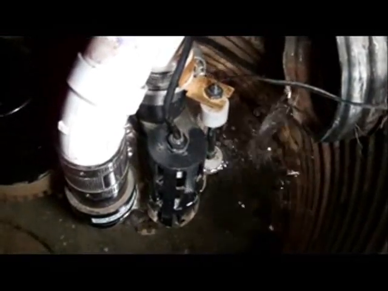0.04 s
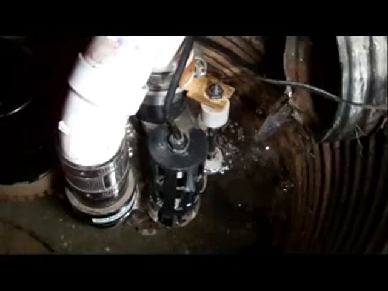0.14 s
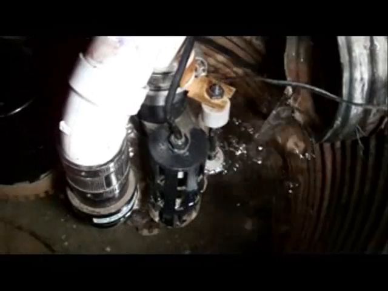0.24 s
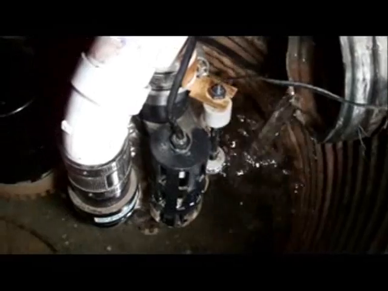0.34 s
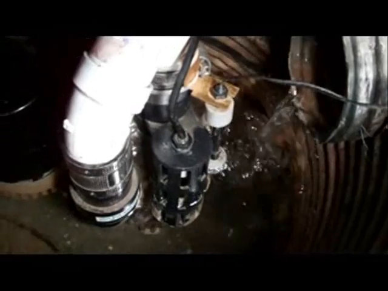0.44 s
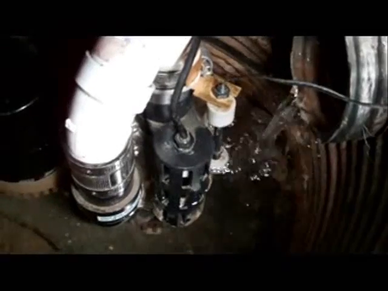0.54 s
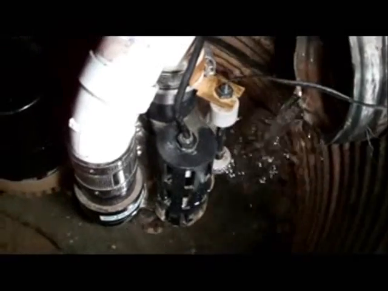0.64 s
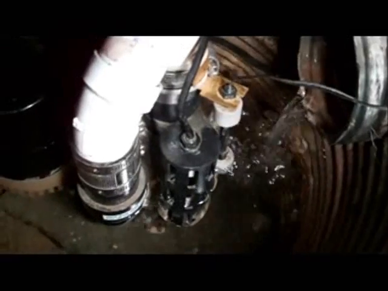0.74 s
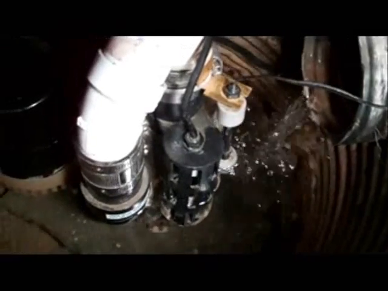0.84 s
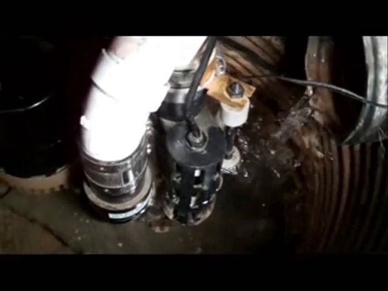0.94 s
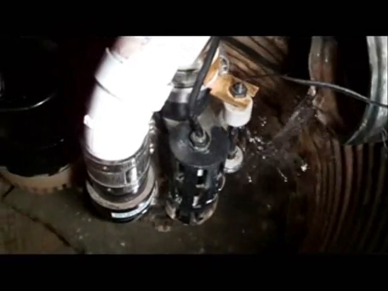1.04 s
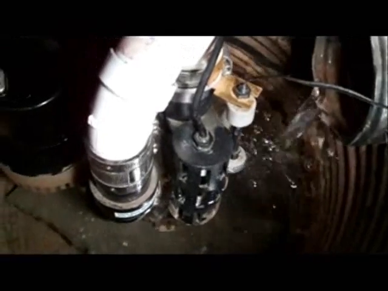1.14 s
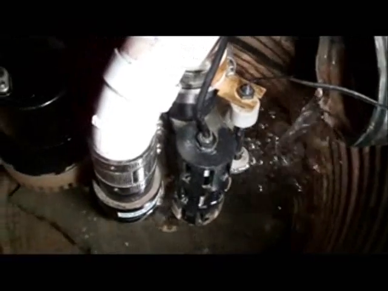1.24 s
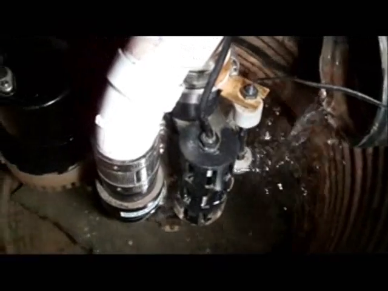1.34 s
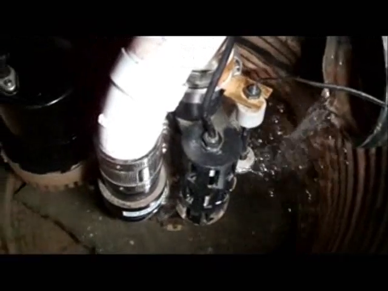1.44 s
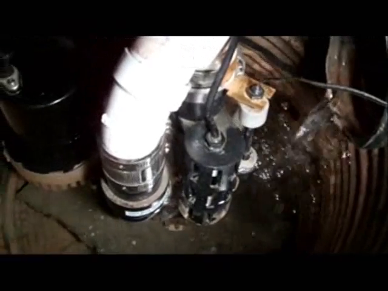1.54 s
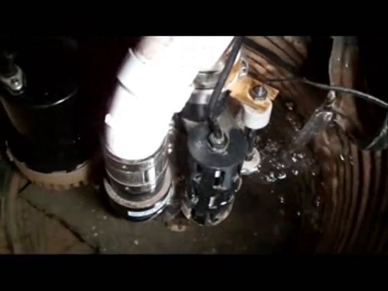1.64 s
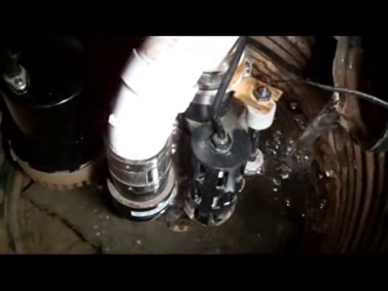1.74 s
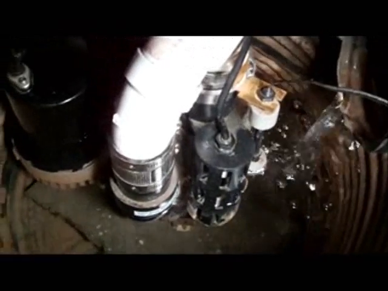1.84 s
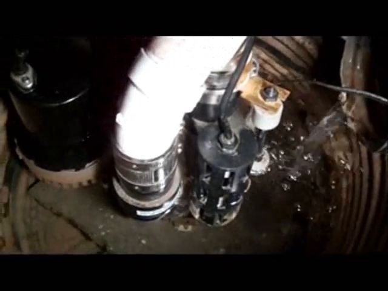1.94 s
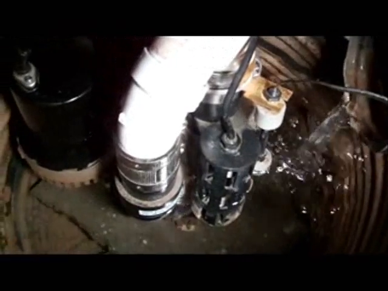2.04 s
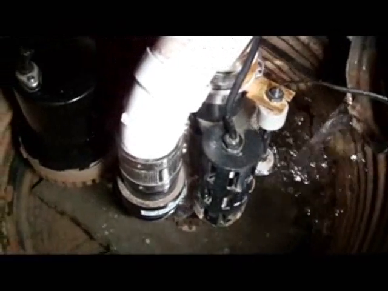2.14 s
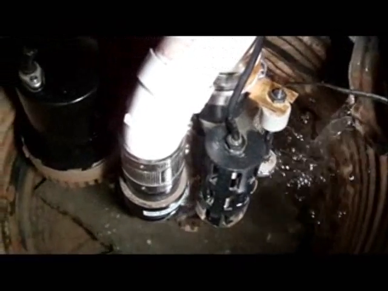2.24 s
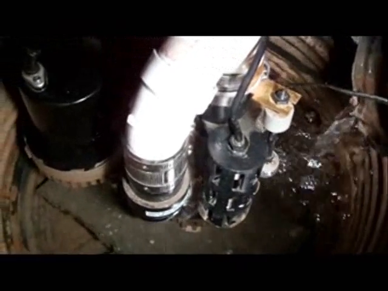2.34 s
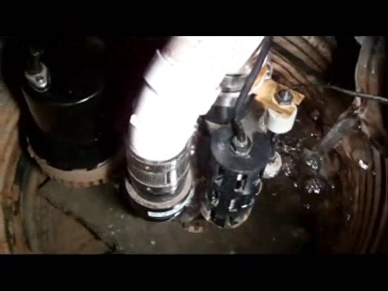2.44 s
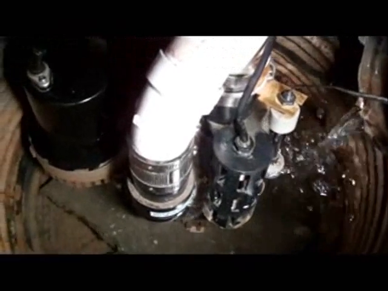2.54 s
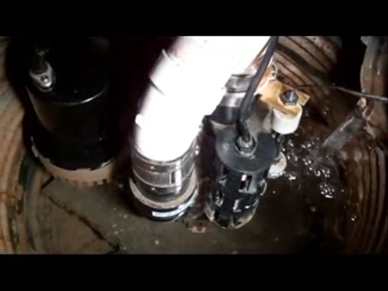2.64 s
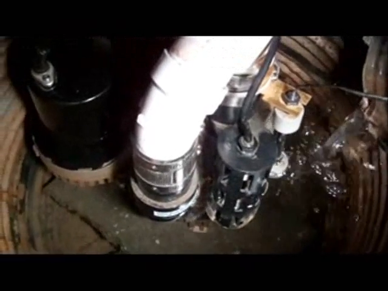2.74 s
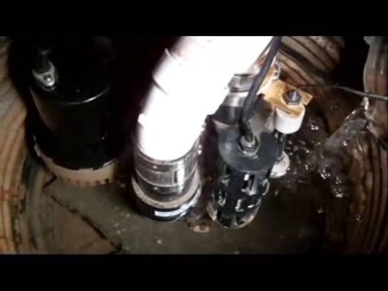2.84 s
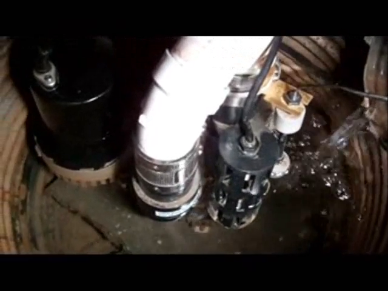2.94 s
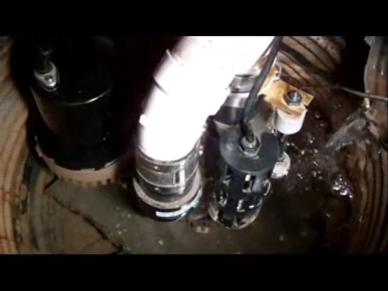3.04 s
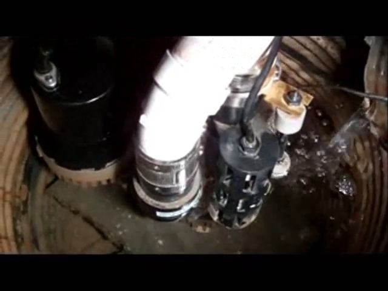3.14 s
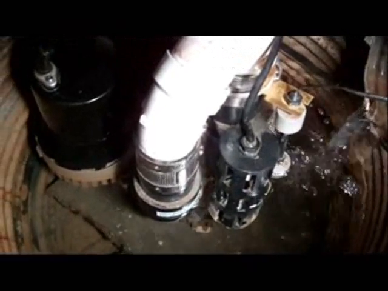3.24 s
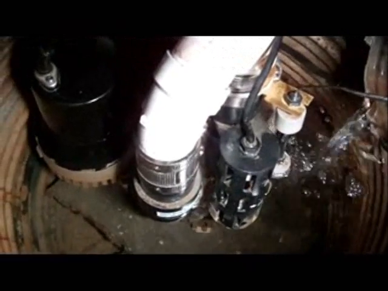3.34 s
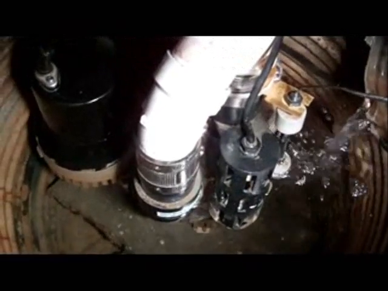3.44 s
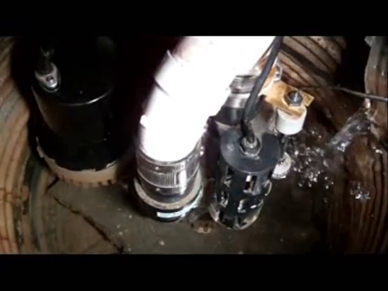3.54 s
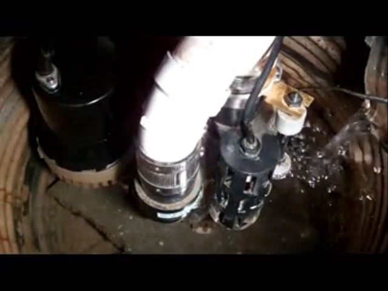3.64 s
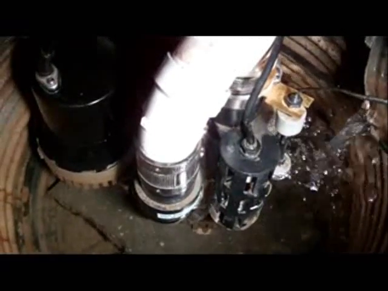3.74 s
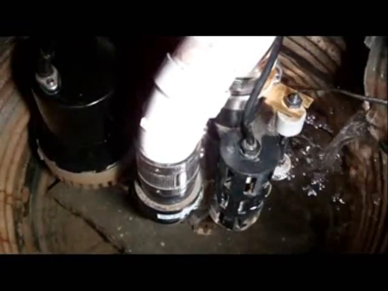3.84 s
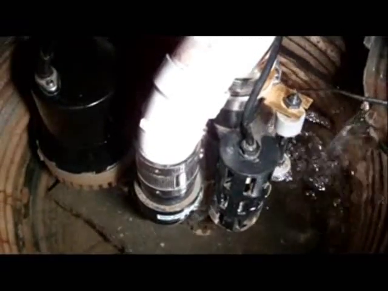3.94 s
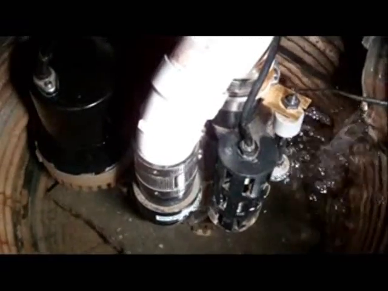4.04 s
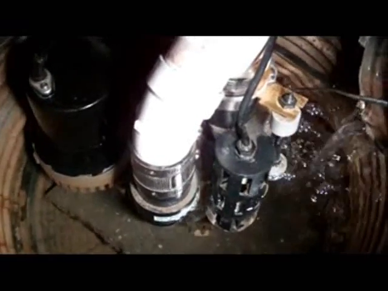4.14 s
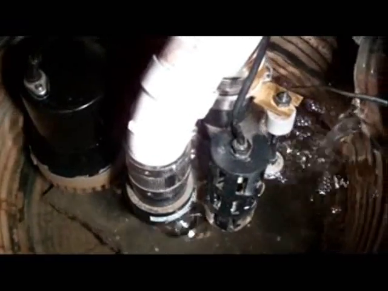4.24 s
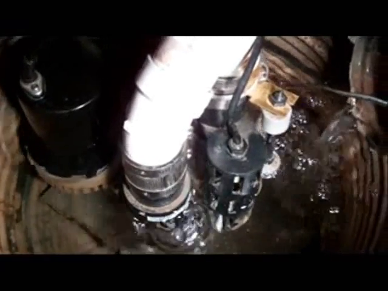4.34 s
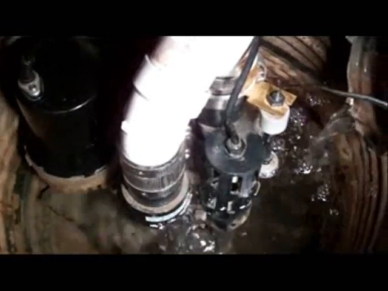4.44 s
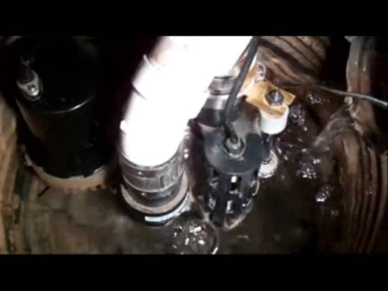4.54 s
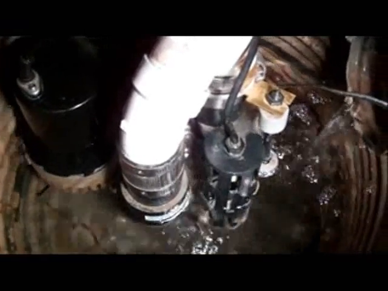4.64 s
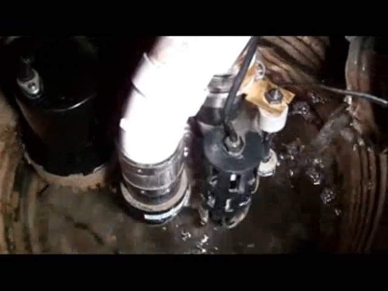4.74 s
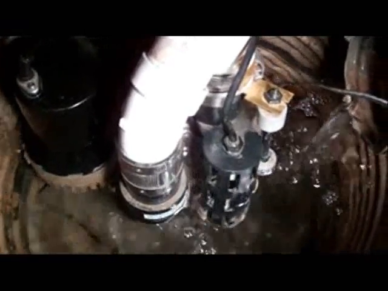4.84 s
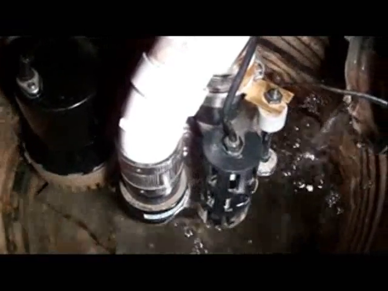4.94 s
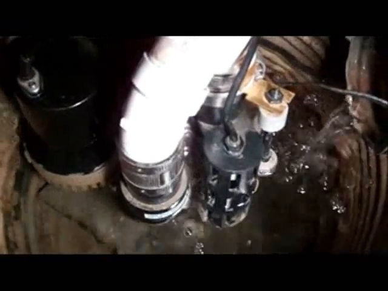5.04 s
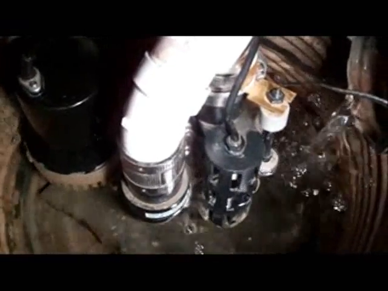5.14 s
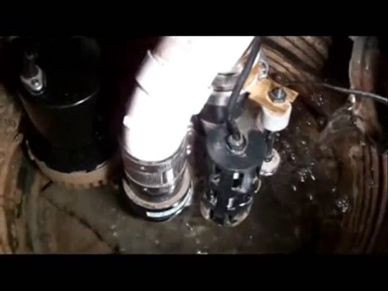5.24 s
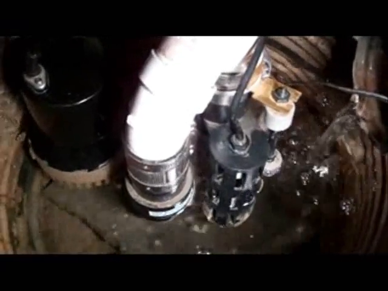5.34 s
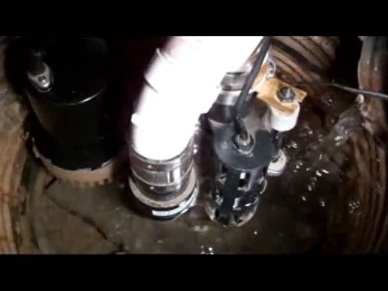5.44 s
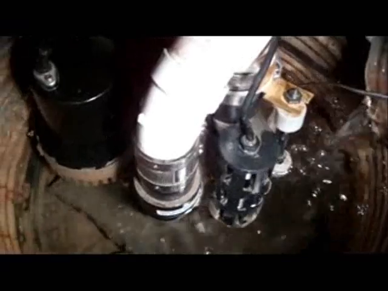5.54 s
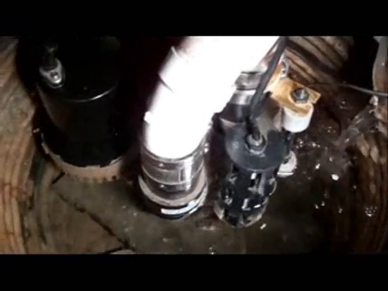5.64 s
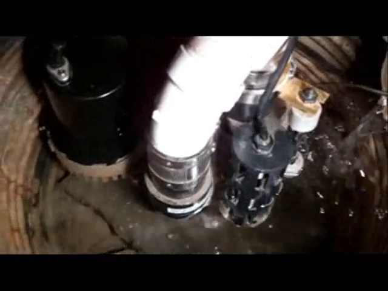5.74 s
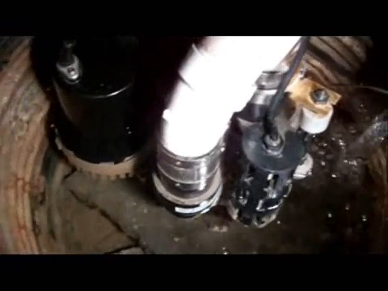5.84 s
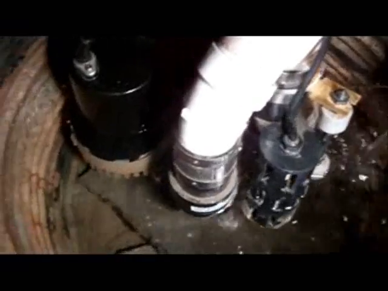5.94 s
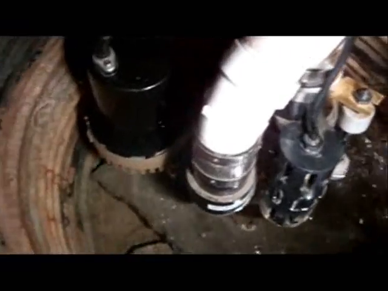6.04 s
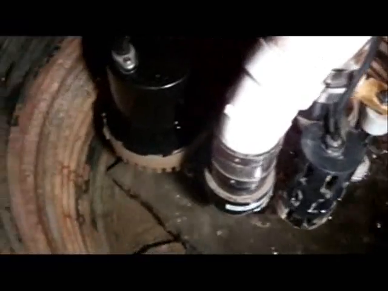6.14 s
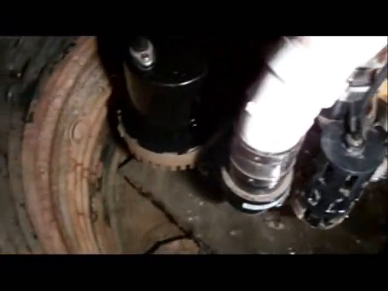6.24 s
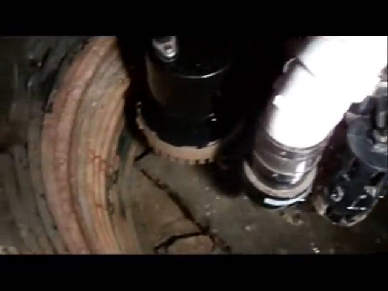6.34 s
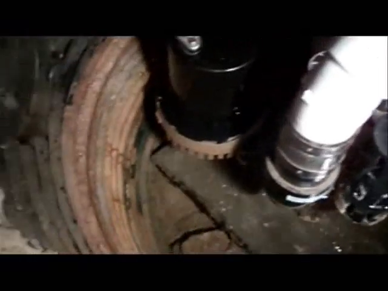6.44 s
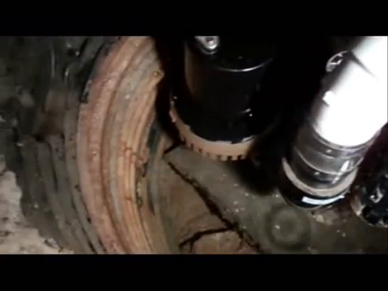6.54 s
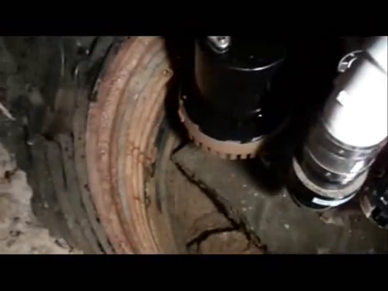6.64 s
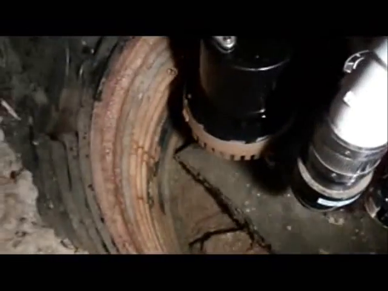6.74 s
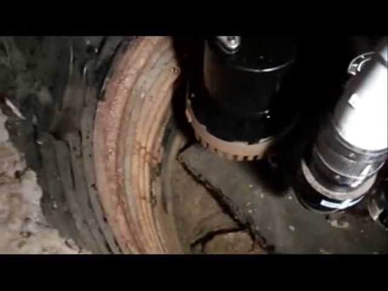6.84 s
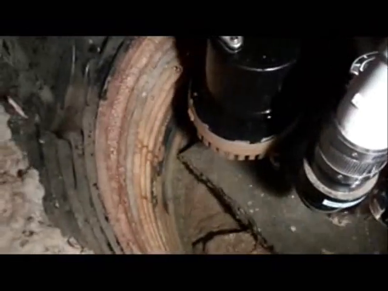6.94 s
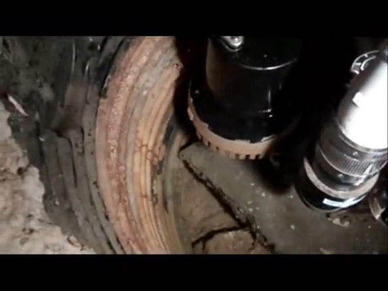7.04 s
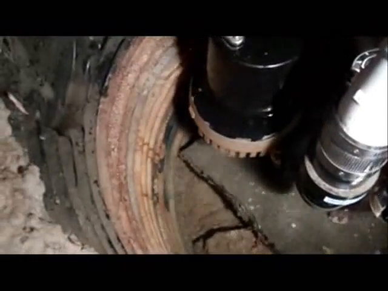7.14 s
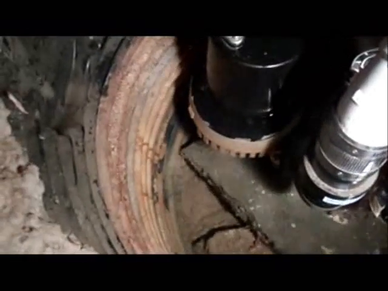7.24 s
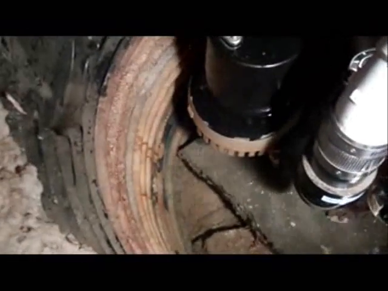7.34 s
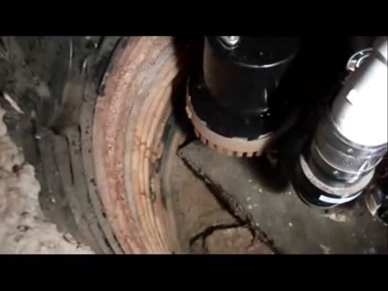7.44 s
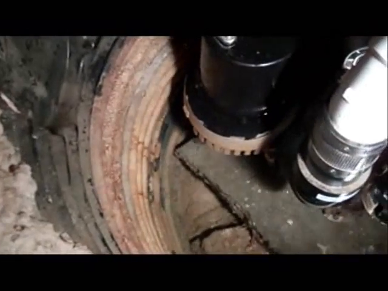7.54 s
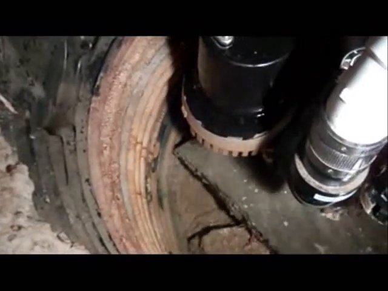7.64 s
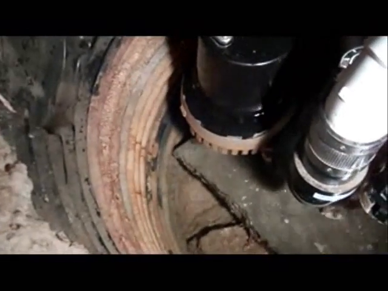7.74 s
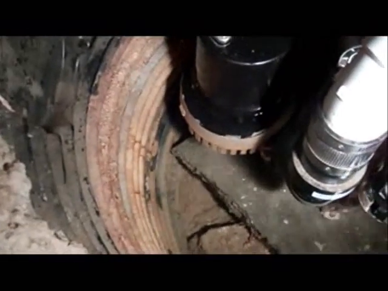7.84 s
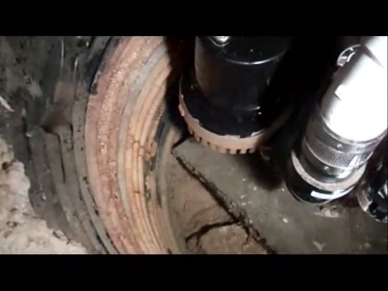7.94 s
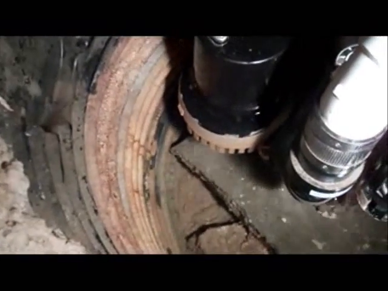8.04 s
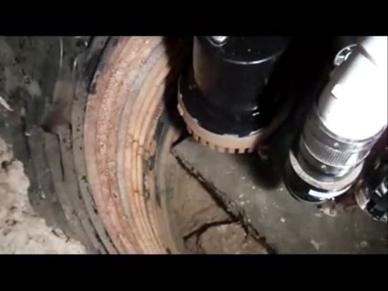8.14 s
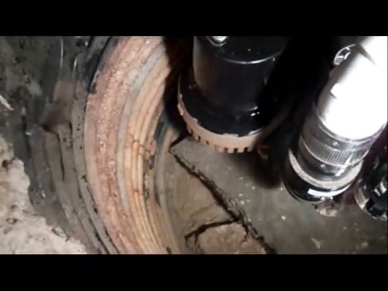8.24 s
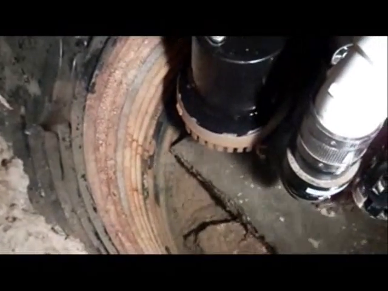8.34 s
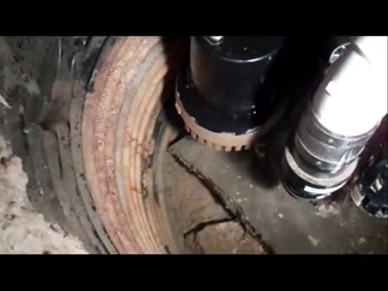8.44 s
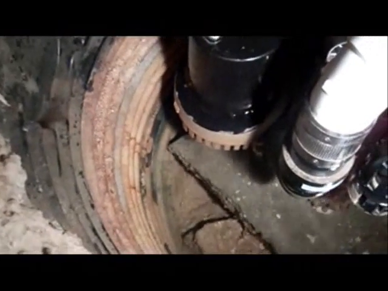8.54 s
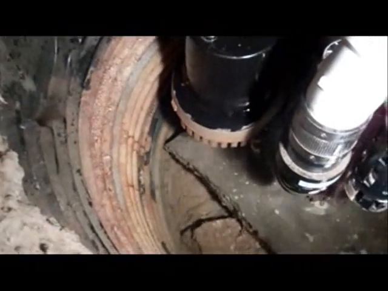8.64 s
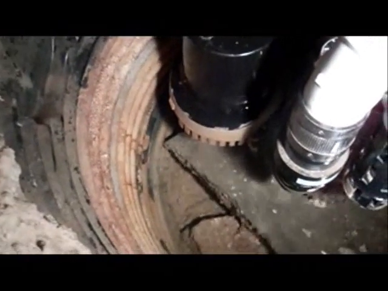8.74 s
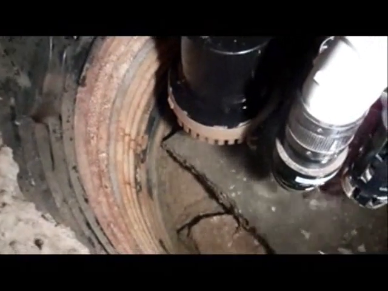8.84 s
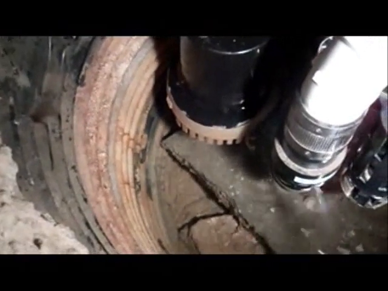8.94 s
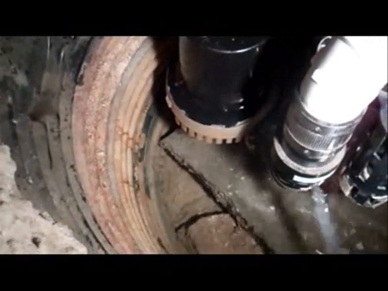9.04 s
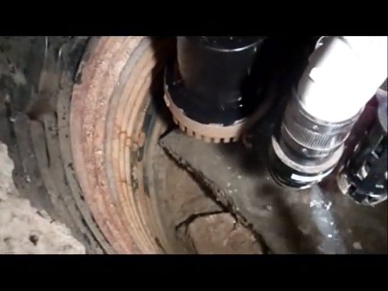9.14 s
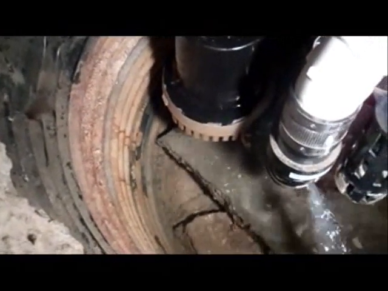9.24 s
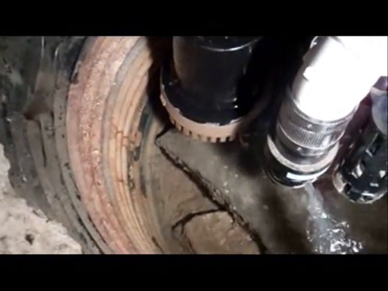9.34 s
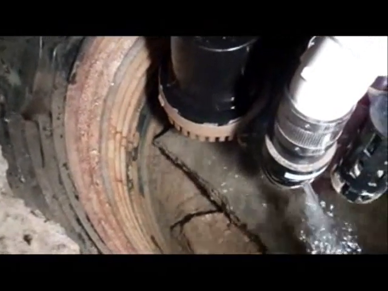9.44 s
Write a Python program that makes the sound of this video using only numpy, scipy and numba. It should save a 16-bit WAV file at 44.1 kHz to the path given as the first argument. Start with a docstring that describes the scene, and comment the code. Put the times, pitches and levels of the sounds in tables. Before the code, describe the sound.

From the start, a thin stream of water trickles into a basement sump pit, pattering in uneven surges with crisp little slaps and plopping bubbles. At about 4.2 seconds the trickle gives way to a small electric pump, which spins up quickly with a brief rumble and a rising gulp. Its motor keeps up a wavering whine and rough hum, sagging slightly in pitch until about 6 seconds, while water rushes and gurgles up a pipe. A vent hole sprays with a hiss, whistling faintly from about 4.8 to 5.7 seconds, then spitting in short irregular spurts until about 8.4 seconds. The pipe rush softens after 6.5 seconds, and occasional drips and plops return. Near 9 seconds the spray turns thinner and brighter, and the pump is still running, a little quieter, at 9.5 seconds. Everything sounds close, with a short hollow echo from the pit.

```python
"""First you hear a thin stream of water slapping into a round basement sump pit, where trapped bubbles plop.
After about four seconds a small pump starts with a gulp. Its motor whines on multiples of the shaft
speed, water rushes up the pipe, and a vent hole sprays, whistles and spits. The air in the pit rings,
and its walls add a short echo to all the water sounds."""
import sys
import numpy as np
from scipy import signal
from scipy.fft import rfft, irfft, next_fast_len
from scipy.io import wavfile
from scipy.ndimage import uniform_filter1d
from numba import njit

SR = 44100
rng = np.random.default_rng(int(sys.argv[2]) if len(sys.argv) > 2 else 0)


def wrap_up_sound(samples):
    """Save the sound to the file named by the first command line argument, as 16-bit audio."""
    columns = np.atleast_2d(samples).T
    # keep every value between -1 and 1, then stretch to whole-number steps
    tamed = np.clip(columns, -1, 1)
    steps = np.round(tamed * 32767).astype(np.int16)
    wavfile.write(sys.argv[1], SR, steps)


N = 417627
TIME = np.arange(N) / SR
FFT_SIZE = next_fast_len(N)


def undb(db):
    """Turn decibels into a number to multiply by."""
    return 10 ** (np.asarray(db) / 20)


def unit(x):
    """Scale a sound so that its average strength (rms) is 1."""
    return x / np.sqrt(np.mean(x ** 2))


def curves(table):
    """Join the rows of a time table with straight lines: one curve for each value column."""
    times, *columns = np.transpose(table)
    return [np.interp(TIME, times, column) for column in columns]


def over_hz(table, column=1):
    """Read one column of a frequency table at every frequency of the spectrum."""
    columns = np.transpose(table)
    return np.interp(np.log(np.fft.rfftfreq(FFT_SIZE, 1 / SR) + 1), np.log(columns[0]), columns[column])


def walk(rate):
    """A random wobble that slides to a new value about `rate` times a second."""
    step = int(SR / rate)
    return uniform_filter1d(np.repeat(rng.standard_normal(N // step + 1), step), step)[:N]


def hold(start_s, length_s, edge_s):
    """Fade in, stay at 1, fade out; the fades are centred on the start and the end."""
    t = TIME - start_s
    return np.clip(np.minimum(t, length_s - t) / edge_s + .5, 0, 1)


def keep_highs(x, hz, order):
    """Turn down everything below hz."""
    return signal.sosfilt(signal.butter(order, hz, "high", fs=SR, output="sos"), x)


def band(x, low_hz, high_hz):
    """Keep what lies between two frequencies."""
    return signal.sosfilt(signal.butter(2, [low_hz, high_hz], "band", fs=SR, output="sos"), x)


def gritty(scatter_db, rate):
    """Noise whose level jumps quickly, like many droplets."""
    return rng.standard_normal(N) * undb(scatter_db * walk(rate))


def droplets(count, scatter_db, t60):
    """Loudness curve of drops landing at random: each starts at once and fades 60 dB in t60 seconds."""
    when, big = rng.random((count, 2)).T
    hits = np.zeros(N)
    hits[(when * N).astype(int)] = undb(-scatter_db * np.log(1 - 0.8 * big))
    return unit(signal.lfilter([1], [1, -1000. ** (-1 / (t60 * SR))], hits))


@njit
def bubble_tones(start, hz, t60, size, glide, swell_cycles):
    """Each bubble is a tone that swells, fades and rises in pitch as it nears the surface."""
    out = np.zeros(N)
    for b in range(len(start)):
        length = t60[b] * SR
        cycles, gain, fade = 0., size[b], 1000. ** (-1 / length)
        for i in range(min(int(length), N - start[b])):
            cycles += hz[b] * (1 + glide[b] * i / length) / SR
            gain *= fade
            out[start[b] + i] += gain * min(cycles / swell_cycles[b], 1.) * np.sin(2 * np.pi * cycles)
    return out


def fizz(count, low_hz, octaves, cycles, scatter_db, glide):
    """A crowd of bubbles at random moments; the higher ones die away sooner."""
    when, pitch, big, rise = rng.random((count, 4)).T
    hz = low_hz * 2 ** (octaves * pitch)
    size = undb(-scatter_db * np.log(1 - .93 * big))
    return unit(bubble_tones((when * N).astype(int), hz, cycles / hz, size, glide * rise, 1 + 2 * rise))


# How alike the left and right sides sound: f/Hz, likeness/0-1
LIKENESS = [(30, 0.47), (200, 0.77), (1000, 0.71), (3000, 0.54), (8000, 0.17)]
def spread(left, other, colour):
    """Give noise a tone colour and width: the right side is part left noise, part other noise."""
    alike, gain = np.clip(over_hz(LIKENESS), 0, 1), undb(over_hz(colour))
    shared, separate = rfft(left, FFT_SIZE) * gain, rfft(other, FFT_SIZE) * gain
    right = alike * shared + np.sqrt(1 - alike ** 2) * separate
    return unit(irfft(np.array([shared, right]), FFT_SIZE)[:, :N])


# Tone colour of the quiet room: f/Hz, level/dB
BASEMENT_COLOUR = [(25, 2), (120, 1), (450, 1.5), (1300, -16), (6000, -7), (12000, -12.5)]
def basement():
    """A faint, low, steady noise behind everything."""
    return undb(-49.5) * spread(rng.standard_normal(N), rng.standard_normal(N), BASEMENT_COLOUR)


@njit
def echo(x, lag, gain, damp):
    """Sound bounces across the pit every `lag` samples, duller each time."""
    out, dulled = x.copy(), 0.
    for i in range(lag, len(x)):
        dulled += (1 - damp) * (out[i - lag] - dulled)
        out[i] += gain * dulled
    return out


# Notes at which the air in the pit rings: f/Hz, width/Hz, level/dB
PIT_NOTES = [(760.5, 26.6, -4.5), (1266, 44, -3.5), (2592, 63, -6)]
def pit(water, echo_s=.00393):
    """The pit rings and echoes; a second, later echo differs a little between left and right."""
    ringing = sum(undb(db) * signal.lfilter(*signal.iirpeak(hz, hz / width, fs=SR), water)
                  for hz, width, db in PIT_NOTES)
    sides = [echo(side, int(echo_s * SR), gain=0.23, damp=0.59) for side in water + ringing]
    return np.array([echo(side, lag, gain=0.2, damp=0.29) for side, lag in zip(sides, (431, 487))])


# How loud the trickle is: t/s, level/dB
TRICKLE_LEVEL = [(0.0, -36), (0.1, -37), (0.38, -33), (0.57, -35.5), (0.74, -30.5), (0.88, -37),
                 (1.1, -41.5), (1.45, -39), (1.62, -39), (1.97, -31.5), (2.06, -45.5), (2.2, -41.5),
                 (2.25, -40.5), (2.68, -27.5), (2.81, -40.5), (3.02, -34.5), (3.42, -40), (3.55, -34.5),
                 (4.2, -29)]
# Tone colour of its hiss: f/Hz, level/dB
TRICKLE_COLOUR = [(300, 19), (700, -6), (1300, 5.5), (2600, 8.5), (7000, -1.5), (12000, 1.5)]
def trickle():
    """The falling stream burbles, fizzes and patters with droplets."""
    (level_db,) = curves(TRICKLE_LEVEL)
    burble = fizz(count=4500, low_hz=622, octaves=2.6, cycles=52, scatter_db=9.5, glide=0.25)
    burble *= undb(5.4 * walk(200))
    fine = np.array([fizz(count=2500, low_hz=2473, octaves=2.55, cycles=118, scatter_db=9, glide=0.51)
                     for _ in range(2)])
    fine = fine + 0.23 * fine[::-1]  # each side hears a little of the other
    hiss = spread(gritty(1.4, 400), gritty(6.36, 450), TRICKLE_COLOUR)
    # drops of each size ring in their own band, and all of them tick across the bands
    edges_hz = 700. * 1.6 ** np.arange(8)
    rings = sum(droplets(count=420, scatter_db=6.5, t60=0.063) * band(hiss, low, high)
                for low, high in zip(edges_hz, edges_hz[1:]))
    ticks = droplets(count=450, scatter_db=7.5, t60=0.031) * hiss
    patter = keep_highs(rings + undb(-7.5) * ticks + undb(-23.5) * hiss, 600, order=3)
    surges = undb(level_db + 2.76 * walk(35))  # the stream lands in lumps
    return surges * (undb(-12) * burble + undb(-10.5) * fine + undb(-4) * patter)


# Bubbles that stand out one by one: t/s, relative level/dB, starting f/Hz
PLOPS = [(0.146, -28, 1245), (0.252, -21.5, 1270), (0.34, -23, 1240), (0.386, -17, 2150),
         (0.435, -21.5, 2900), (0.671, -24, 1160), (0.76, -26, 1280), (0.911, -31, 1284),
         (1.159, -25.5, 1755), (1.189, -21.5, 1120), (1.264, -20, 2250), (1.291, -18.5, 1176),
         (1.503, -25, 1262), (1.762, -19.5, 1160), (1.903, -11.5, 1850), (1.939, -22.5, 1270),
         (2.295, -15, 1286), (2.437, -18, 2750), (2.477, -20, 753), (2.517, -19, 717), (2.54, -16, 793),
         (2.576, -18.5, 1694), (2.612, -14.5, 836), (2.639, -21.5, 770), (2.652, -18, 2100),
         (2.9, -28.5, 720), (2.944, -23, 716), (2.97, -21, 760), (3.013, -18, 940), (3.186, -29, 807),
         (3.287, -24.5, 830), (3.536, -11.5, 2150), (3.637, -18, 2300), (3.951, -14, 2250),
         (4.053, -9.5, 2400), (4.152, -25, 1295), (4.222, -23.5, 1270), (4.243, -14, 937), (4.322, -7, 278),
         (6.11, -14.5, 960), (7.51, -20, 744), (8.301, -19.5, 950), (8.375, -22, 1850), (8.69, -19, 794)]
def bubbles(small_above_hz=1800):
    """Big bubbles plop at once on a nearly steady note; small ones swell, climb and end sooner."""
    start_s, db, hz = np.transpose(PLOPS)
    small = hz > small_above_hz
    glide = np.where(small, 1.2, 0.16) * (.5 + .5 * rng.random(len(hz)))
    t60 = 0.067 * np.where(small, .5, 1)
    size = undb(db + np.where(small, 2, -5))
    swell_cycles = np.where(small, 18, .5)
    tones = bubble_tones((start_s * SR).astype(int), hz, t60, size, glide, swell_cycles)
    return tones * undb(4 * walk(260))  # the churned surface makes them flutter


# Water hitting the surface: t/s, relative level/dB, ring f/Hz
SURFACE_HITS = [(0.1464, -9, 2400), (0.2124, -13, 10900), (0.471, -12.5, 3570), (0.6088, -12, 4070),
                (0.637, -9.5, 6500), (0.7402, -8.5, 5550), (0.7758, -10.5, 4240), (0.9492, -9.5, 2510),
                (0.9842, -15, 6130), (1.1375, -10, 6000), (1.2662, -9.5, 5900), (1.3575, -12.5, 2790),
                (1.4733, -10.5, 6740), (1.5463, -10.5, 2540), (1.6433, -17.5, 7360), (1.718, -12, 2480),
                (1.881, -11, 6000), (1.9838, -8.5, 5050), (2.0087, -12.5, 9600), (2.25, -14.5, 6000),
                (2.289, -9.5, 3200), (2.3432, -10, 4970), (2.689, -12, 4660), (2.721, -10.5, 5300),
                (2.729, -6.5, 4940), (3.059, -10.5, 8800), (3.104, -10, 3050), (3.288, -8, 6740),
                (3.358, -15.5, 1380), (3.379, -12.5, 1240), (3.49, -15.5, 2610), (3.505, -15.5, 4900),
                (3.629, -7, 4080), (3.666, -16, 4750), (4.0697, -8, 4470), (4.1974, -14, 6900),
                (4.239, -5, 4240), (4.523, -8, 2470), (7.554, -7, 2920), (7.8257, -11, 7400),
                (8.142, -3, 5800), (8.528, -7, 6860), (8.8003, -6.5, 4340), (9.359, -11, 2380)]
def slaps(ring_t60=0.047, tick_t60=0.0038, splash_t60=0.067):
    """Each slap is a crisp tick with a short ring and a soft splash, a little to one side."""
    out, t = np.zeros((2, N)), np.arange(2048) / SR
    noises = rng.standard_normal((len(SURFACE_HITS), 3, len(t)))
    for (start_s, db, hz), noise in zip(SURFACE_HITS, noises):
        grit = noise[0] + 0.5 * noise[1:]  # shared noise, plus some for each side
        ring = signal.lfilter(*signal.iirpeak(hz, 1 / 0.14, fs=SR), grit * 1000. ** (-t / ring_t60))
        tick = undb(-8) * grit * 1000. ** (-t / tick_t60)
        splash = undb(-17) * grit * 1000. ** (-t / splash_t60)
        slap = ring + tick + splash
        lean_db = noise[0, -1] * np.array([[1], [-1]])
        slap *= undb(db - 2 + lean_db) / np.abs(slap).max()
        i = int(start_s * SR)
        out[:, i:i + len(t)] += slap[:, :N - i]
    return keep_highs(out, 800, order=2)


def priming(gulp_s=4.372, length_s=.06, low_hz=490, octaves=1.2):
    """The pump gulps air in one rough, rising note and rumbles while it fills with water."""
    progress = np.clip((TIME - gulp_s) / length_s, 0, 2)
    hz = low_hz * 2 ** (octaves * progress) * (1 + 0.04 * walk(300))
    note = np.sin(2 * np.pi * np.cumsum(hz) / SR)
    gulp = undb(-21 + 2 * walk(150)) * hold(gulp_s, length_s, edge_s=.012) * note
    rumble = unit(band(rng.standard_normal(N), 120, 510))
    return gulp + undb(-32.5) * hold(start_s=4.26, length_s=0.423, edge_s=0.039) * rumble


# How much the water slows the shaft: t/s, speed lost/Hz
SLOWDOWN = [(4.6, 0), (4.87, 4), (5.2, 4.5), (6.2, 8)]
def shaft_turns(free_hz=68.3, start_s=4.205, spin_up_s=.058, wobble=.002):
    """Count the shaft's turns: it spins up quickly, then the load of the water holds it back."""
    spin = 1 - np.exp(-np.maximum(TIME - start_s, 0) / spin_up_s)
    (lost_hz,) = curves(SLOWDOWN)
    return np.cumsum((free_hz * spin - lost_hz) * (1 + wobble * walk(20))) / SR


def shaft_tones(turns, tones, waver_db):
    """Pure tones at multiples of the shaft speed, each wavering in level on its own."""
    return sum(undb(db + waver_db * walk(14)) * np.sqrt(2) * np.sin(2 * np.pi * multiple * turns)
               for multiple, db in tones)


# How loud the motor's parts are: t/s, whine level/dB, high whine level/dB, hum level/dB
MOTOR_LEVELS = [(4.285, -49, -39, -41), (4.305, -20.5, -37, -48), (4.335, -39, -33, -48),
                (4.37, -38, -50, -34), (4.68, -35, -41, -39.5), (4.86, -41, -41, -84),
                (4.99, -42, -41, -34), (5.55, -43.5, -42, -46), (6.15, -32.5, -38, -40),
                (6.7, -40.5, -43, -39), (7.6, -35.5, -42.5, -34.5), (8.3, -33, -49, -36),
                (8.95, -30, -43.5, -31.5), (9.15, -38.5, -48.5, -38.5), (9.47, -41.5, -58, -42.5)]
# The tones in each part: multiple of the shaft speed, relative level/dB
WHINE_TONES = [(10, -14), (30, 0)]
HIGH_TONES = [(40, -2.5), (50, -3.5), (60, -5)]
HUM_TONES = [(1, -19.5), (3, 0.5), (8, -7.5)]
def motor():
    """The motor whines, and the bladed wheel that pushes the water adds a rough hum."""
    whine_db, high_db, hum_db = curves(MOTOR_LEVELS)
    turns = shaft_turns()
    whine = undb(whine_db) * shaft_tones(turns, WHINE_TONES, waver_db=1.5)
    high_whine = undb(high_db) * shaft_tones(turns, HIGH_TONES, waver_db=4)
    hum = undb(hum_db + 2.5 * walk(70)) * shaft_tones(turns, HUM_TONES, waver_db=2.5)
    return whine + high_whine + hum


# How loud the water in the pipe is: t/s, level/dB
PIPE_LEVEL = [(4.2, -52), (4.25, -27), (4.4, -23.5), (4.85, -29), (5.0, -26.5), (6.16, -28.5), (6.5, -30.5),
              (6.65, -38), (6.85, -32), (7.95, -35), (8.95, -33), (9.15, -37.5), (9.46, -41.5)]
# Tone colour of its rush: f/Hz, level/dB
PIPE_COLOUR = [(20, -63), (50, -7), (95, -18.5), (150, 2), (330, -11.5), (480, -0.5), (1000, -4.5),
               (2500, -6.5), (4500, -25.5)]
def pipe():
    """Pumped water rushes and gurgles up the pipe, and the pipe's mouth rings."""
    (level_db,) = curves(PIPE_LEVEL)
    rush = spread(gritty(1.73, 30), gritty(1.0, 30), PIPE_COLOUR)
    gurgle = fizz(count=1800, low_hz=548.6, octaves=2.875, cycles=27, scatter_db=6, glide=1.0)
    mouth = unit(band(rush, 417, 495))
    return undb(level_db) * (rush + undb(-7) * gurgle + undb(-13.5) * mouth)


# The jet between spurts: t/s, level/dB, treble boost/dB, wholeness/0-1 (0 is broken into drops)
VENT_JET = [(4.2, -24, -38, 0.7), (4.61, -29.5, -5, 0.8), (4.78, -24.5, -3.5, 1), (5.65, -24.5, -5, 0.98),
            (5.83, -24, -8, 0), (6.5, -25, -4.5, 0.4), (6.65, -33, -1.5, 0.2), (7.0, -28.5, -1.5, 0),
            (7.5, -24.5, -3.5, 0), (7.9, -29.5, -1.5, 0.04), (8.5, -27.5, -3.5, 0), (8.9, -24.5, -4.5, 0),
            (9.08, -27.5, 7, 0.7), (9.46, -32.5, 6, 0.87)]
# Tone colour of the spray: f/Hz, level/dB
VENT_COLOUR = [(900, -10.5), (2400, -1), (4300, 4.5), (6000, 1.5), (7600, 2.5), (12000, -3)]
# Narrow bands where a whole jet sings: f/Hz, width/Hz
VENT_WHISTLES = [(2560, 63), (4400, 230), (5430, 110), (6520, 82), (9300, 790)]
# Short spurts of unbroken water: t/s, length/s, level/dB
VENT_SPURTS = [(5.704, 0.018, -18.5), (5.865, 0.023, -20.5), (6.137, 0.044, -19.5), (6.256, 0.044, -20),
               (6.357, 0.023, -21), (6.566, 0.028, -20.5), (6.689, 0.02, -27.5), (6.832, 0.09, -22.5),
               (6.954, 0.041, -22.5), (7.061, 0.024, -23), (7.095, 0.079, -21), (7.266, 0.091, -20.5),
               (7.39, 0.026, -23.5), (7.728, 0.039, -22), (7.885, 0.018, -20.5), (7.977, 0.023, -23),
               (8.397, 0.016, -19.5)]
def vent():
    """The vent hole's jet sings while whole and spits once broken; spurts burst out and ring."""
    level_db, treble_db, whole = curves(VENT_JET)
    broken = 1 - np.clip(whole, 0, 1)
    spray = spread(gritty(2.35, 300), gritty(2.1, 300), VENT_COLOUR)
    treble = signal.sosfiltfilt(signal.butter(3, 7000, "high", fs=SR, output="sos"), spray)
    whistle = sum(unit(band(spray, hz - width / 2, hz + width / 2)) for hz, width in VENT_WHISTLES)
    jet = spray + (undb(treble_db) - 1) * treble + undb(-17 - 50 * broken) * whistle
    # a broken jet lands drop by drop
    spatter = 1 - .5 * broken * (1 - droplets(count=700, scatter_db=3.5, t60=0.038))
    spurts = sum(undb(db) * hold(start_s, length_s, edge_s=0.016) for start_s, length_s, db in VENT_SPURTS)
    ring = undb(-17) * spurts * unit(band(spray, 3480, 4100))
    return ring + undb(-1) * np.maximum(spatter * undb(level_db), spurts) * jet


def scene(switch_s=4.22):
    """When the float switch closes, the pump takes over from the trickle; slaps and bubbles go on."""
    pump_on = np.clip((TIME - switch_s) / 0.035, 0, 1)
    falling = slaps() + (1 - pump_on) * trickle() + bubbles()
    pumped = pump_on * (pipe() + vent() + priming())
    return basement() + undb(0.5) * pit(falling + pumped) + pump_on * motor()


# What the microphones at the rim pick up: f/Hz, level/dB, left minus right/dB
MIC_COLOUR = [(60, -2, 2.5), (260, -5.5, 3.5), (1440, 0.5, 3), (3880, 0.5, 3), (7450, 2.5, 5.5),
              (10220, -2, 11.5), (12040, -9, 4.5), (13800, -23, -4), (15300, -60, -5)]
def record(dry, top_hz=16300):
    """The left microphone faces the pit and is louder; both round off peaks and lose the top treble."""
    db, lean_db = over_hz(MIC_COLOUR), over_hz(MIC_COLOUR, column=2) / 2
    heard = irfft(rfft(dry, FFT_SIZE) * undb([db + lean_db, db - lean_db]), FFT_SIZE)[:, :N]
    rounded = .8 * np.tanh(heard / .8)
    return signal.sosfilt(signal.ellip(8, .2, 70, top_hz, fs=SR, output="sos"), rounded)


dry = scene()
out = record(dry)
wrap_up_sound(out)
```